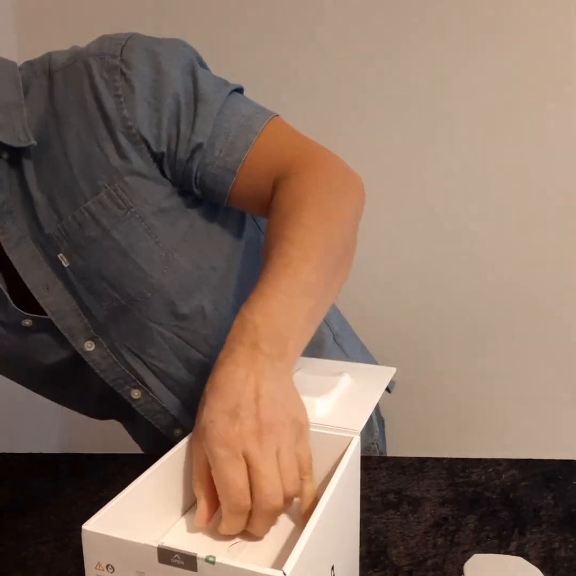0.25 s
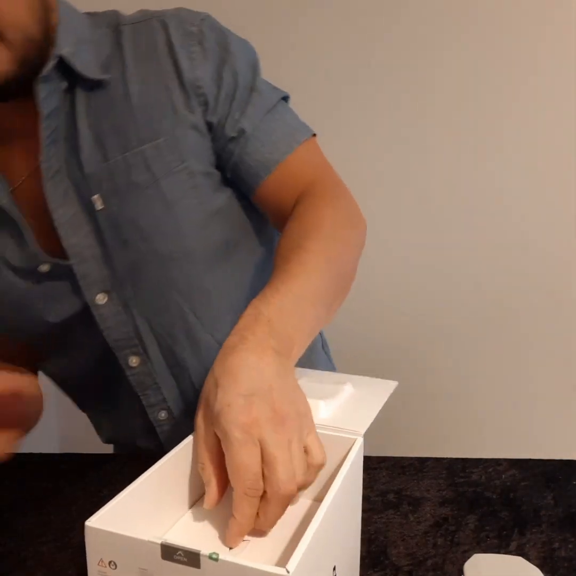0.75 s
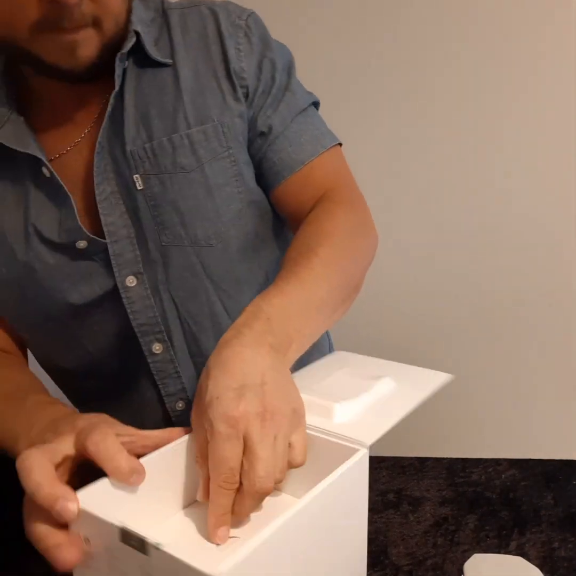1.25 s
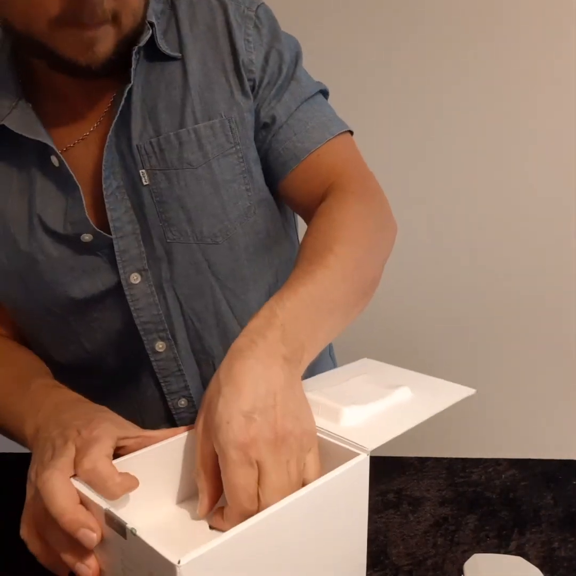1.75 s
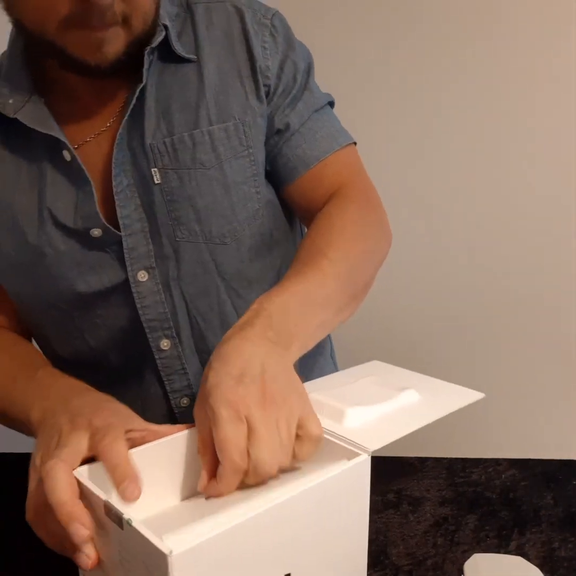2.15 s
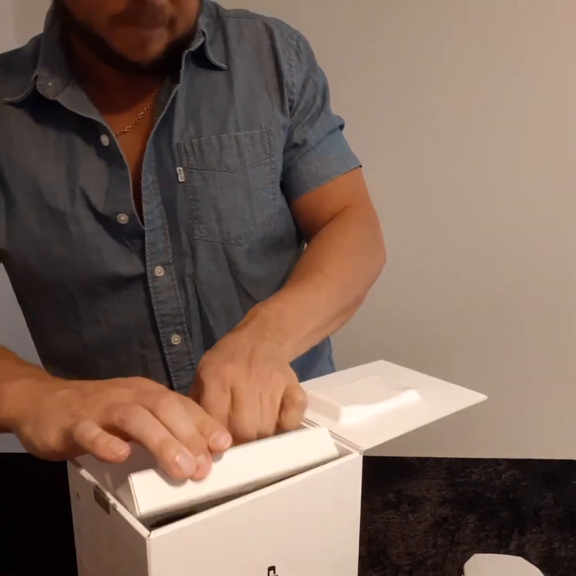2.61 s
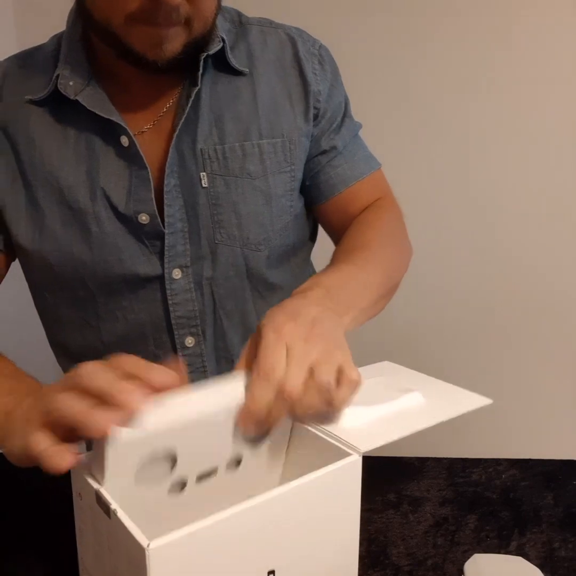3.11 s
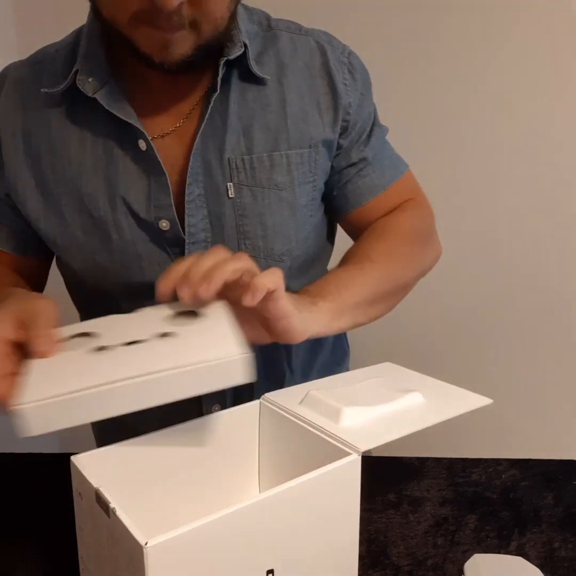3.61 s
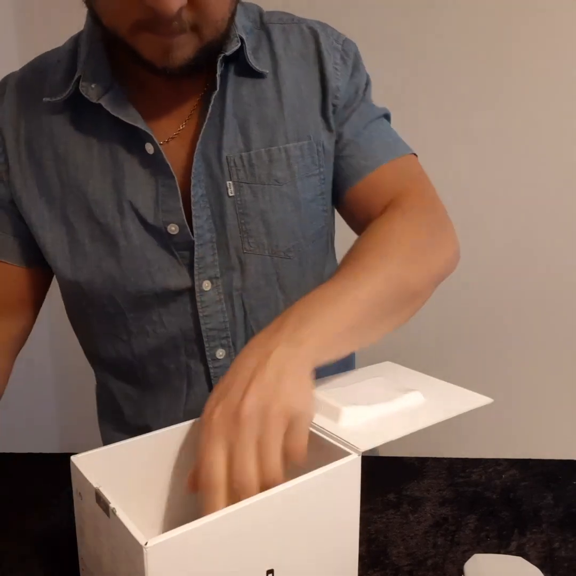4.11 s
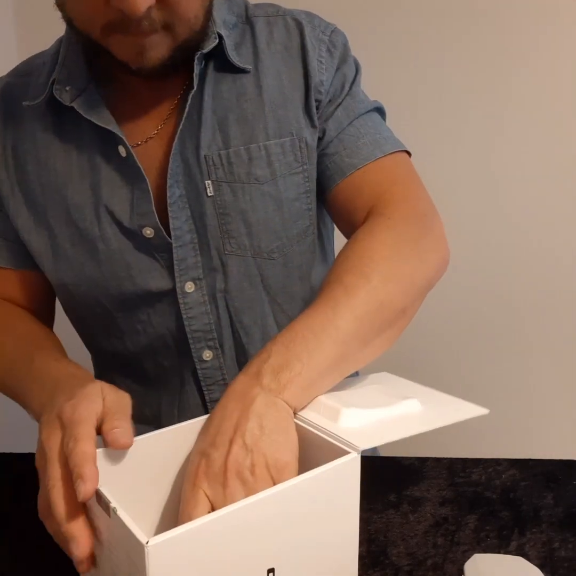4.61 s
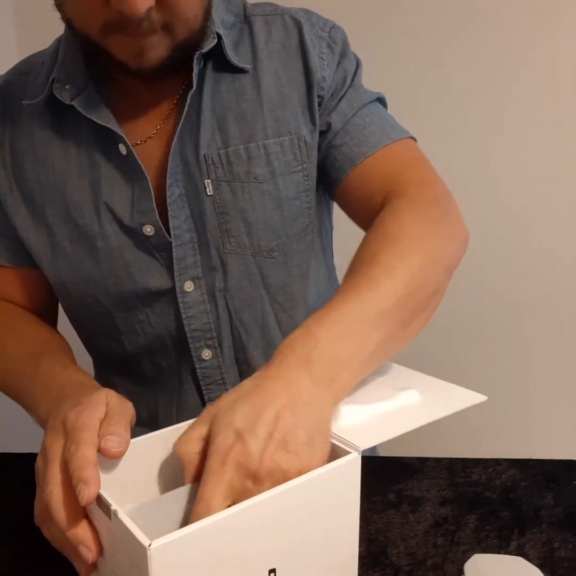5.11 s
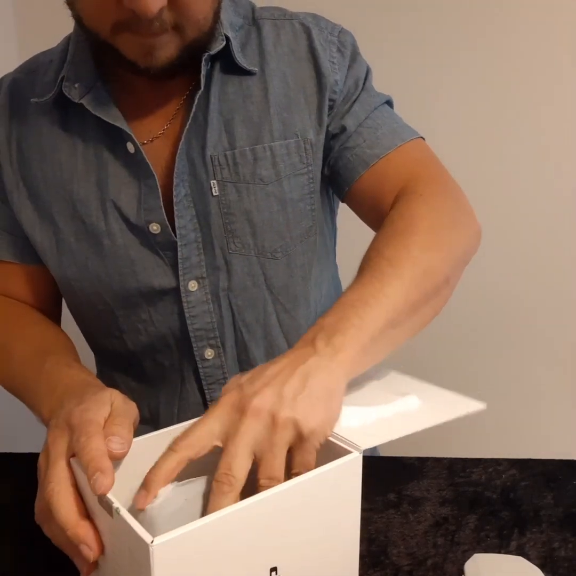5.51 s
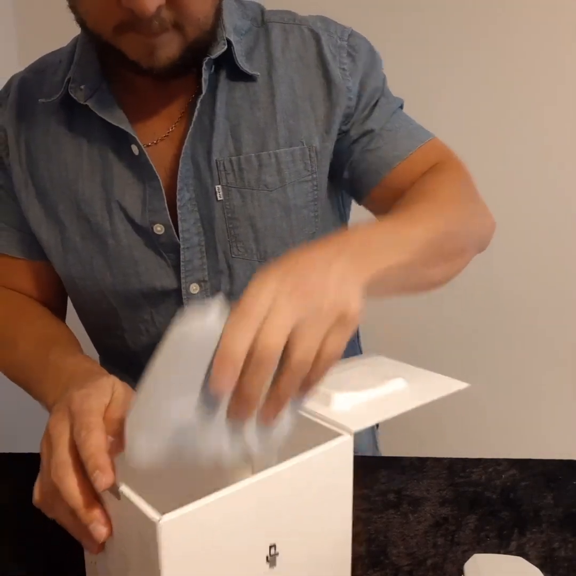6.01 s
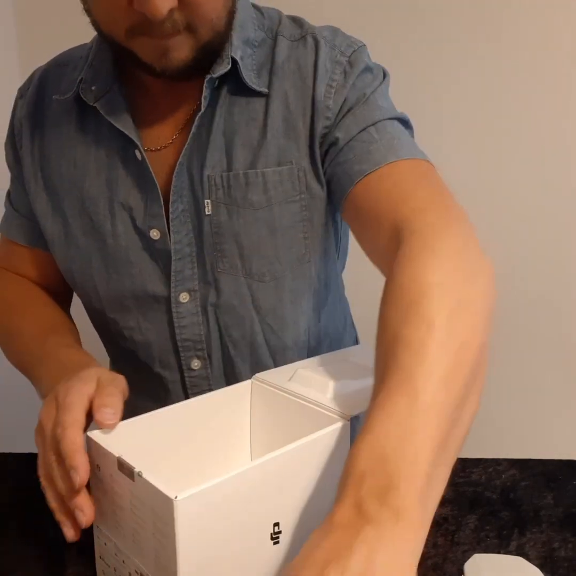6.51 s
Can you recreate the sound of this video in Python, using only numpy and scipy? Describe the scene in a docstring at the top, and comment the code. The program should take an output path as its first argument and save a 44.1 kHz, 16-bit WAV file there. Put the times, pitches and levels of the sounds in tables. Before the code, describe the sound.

A small, quiet, fairly dry room with soft hiss and a faint appliance hum, heard from very close in stereo. Light rubbing begins, and around 0.2 seconds a tight burst of hollow cardboard knocks gives the loudest clunk, with smaller bumps to 0.45. From 0.6 to 2.5 there is only subdued fumbling, with small ticks near 1.3 and 1.5. At 2.65 a card tray pops loose with a brighter knock; clicks and dry, hissing scrapes follow until about 3.9 as it slides out. Between 4.1 and 4.3 a cluster of boxy knocks sounds, with lesser ones at 4.6. A crisp hollow bump and snap come at 5.17, followed by grainy rustling to 6.0. A quieter slide and faint ticks lead to a soft, low thud on the table at 6.63.

```python
"""Unpacking a cardboard box

A hand works inside a hollow cardboard box on a table in a small quiet room: a card tray is prised up
and slid out, then a foam insert. Bumps ring damped modes of the box, card edges and foam snap as filtered
clicks, hand and card scrape as shaped noise, and the foam lands on the ringing table top.
A two-port microphone stands close by; room tone is noise, a faint appliance hum and whine are sines."""
import sys
import numpy as np
from scipy import signal
from scipy.fft import rfft, irfft, next_fast_len
from scipy.io import wavfile
from scipy.ndimage import map_coordinates

SR = 44100
rng = np.random.default_rng(int(sys.argv[2]) if len(sys.argv) > 2 else 0)


def generate_wav(signal):
    """Clip the signal to [-1, 1] and save it as 16-bit WAV at the path in sys.argv[1]."""
    frames = np.transpose(np.atleast_2d(signal))
    scaled = np.clip(frames, -1, 1) * 32767
    pcm = np.round(scaled).astype(np.int16)
    wavfile.write(sys.argv[1], SR, pcm)


N = 297672

# Treble of surface fibres and snap ticks. Each row: frequency in Hz, density in dB per Hz.
FIZZ_SPECTRUM = [(6500, -62), (8000, -2.5), (8800, -12.5), (10500, -4.5), (12200, -1), (14000, -4),
                 (16000, -5)]
# Hand position. Each row: time in seconds, lag of the left port in samples, left-over-right pan in dB.
HAND_PATH = [(0, 11.5, 0.5), (.7, -12.5, 2), (1.5, 7.5, -0.5), (2.4, 4.5, 0.5), (3.2, 5, 0.5), (3.7, -1, 1),
             (4.1, 10, 2), (4.7, 5, 2.5), (5.1, 3.5, 2.5), (5.8, 10, 1.5), (6.3, -11.5, -2), (6.43, 0, 0.5),
             (6.75, 6, -3)]


def amp(db):
    """Gain of a dB value."""
    return 10 ** (np.asarray(db) / 20)


def unit(x):
    """Scaled to rms 1."""
    return x / np.sqrt(np.mean(x ** 2) + 1e-20)


def peaked(x):
    """Scaled to peak 1."""
    return x / np.abs(x).max()


def pan_gains(pan_db):
    """Left and right gains, pan_db apart."""
    return amp([[pan_db / 2], [-pan_db / 2]])


def along(points, hz):
    """(Hz, value) points read on a log frequency axis."""
    f, v = np.transpose(points)
    return np.interp(np.log(hz + 1), np.log(f + 1), v)


def curves(rows):
    """One value per sample for each column after the time."""
    s, *cols = np.transpose(rows)
    return [np.interp(np.arange(N) / SR, s, c) for c in cols]


def wobble(knots_per_s):
    """A smooth random curve through normally distributed knots."""
    knots = rng.standard_normal(int(N * knots_per_s / SR) + 4)
    return map_coordinates(knots, [np.arange(N) * knots_per_s / SR])


def filtered(x, response):
    """x times a response of frequency."""
    n = x.shape[-1]
    m = next_fast_len(n + 4096)
    return irfft(rfft(x, m) * response(np.fft.rfftfreq(m, 1 / SR)), m)[..., :n]


def knocks():
    """Each blow rings the air in the box, its panels, flaps and edges."""
    # Each row: start in seconds, peak levels of flap, boom, panel and edge in dB before panning,
    # struck spot of panel, flap and edge in Hz, pan in dB, contact in seconds, damping factor.
    blows = [(0.108, -40, -64, -43.5, -61.5, 285, 694, 1060, -2, 0.0014, 2.4),
             (0.157, -42, -64, -56, -59.5, 285, 540, 1060, -1.5, 0.0018, 2.8),
             (0.215, -18.5, -26, -13.5, -27, 262, 520, 1200, -5, 0.0024, 0.77),
             (0.223, -8.5, -17.5, -11, -19, 242, 604, 1030, 3, 0.0015, 1.15),
             (0.241, -15.5, -18, -14, -18.5, 253, 675, 1310, -2, 0.0024, 1.7),
             (0.345, -32.5, -26.5, -26, -43.5, 273, 464, 1290, -3.5, 0.0029, 1.7),
             (0.399, -26.5, -40, -23.5, -28, 286, 497, 1060, -1, 0.0015, 2.16),
             (0.429, -45.5, -31.5, -42, -49.5, 328, 460, 2080, 0, 0.0017, 2),
             (0.672, -41, -60.5, -44.5, -61, 283, 724, 1020, -1.5, 0.0025, 0.73),
             (0.916, -66, -57, -60.5, -68.5, 191, 474, 1160, -5.5, 0.0018, 1.9),
             (0.997, -53, -73, -66, -64.5, 345, 692, 1060, -4, 0.0018, 1.1),
             (1.217, -40.5, -51, -43, -63, 231, 443, 1000, 0.5, 0.0023, 4.1),
             (1.265, -39.5, -43.5, -38, -51.5, 307, 480, 2070, -4, 0.0021, 3.2),
             (1.278, -37, -64, -51, -38, 315, 626, 2020, 1.5, 0.0034, 2.1),
             (1.428, -46, -46, -49, -61, 366, 455, 1120, 4, 0.0029, 2.2),
             (1.46, -43, -44.5, -41.5, -50, 353, 487, 1060, -2, 0.002, 1.6),
             (1.487, -40, -35, -44, -44, 191, 533, 1260, -3, 0.0018, 2.7),
             (2.632, -33, -60, -36, -37, 350, 527, 1360, -2.0, 0.0033, 1.1),
             (2.654, -21.5, -31.5, -30, -21.5, 328, 490, 2020, -1, 0.0016, 2.16),
             (2.747, -31, -51, -44.5, -42.5, 339, 690, 1030, -2, 0.0022, 1.75),
             (2.904, -47, -56, -48.5, -50, 300, 550, 1610, -4, 0.0021, 1.7),
             (2.933, -31.5, -59, -45, -31.5, 342, 760, 1710, -2, 0.0021, 2.05),
             (3, -33, -55, -46, -46, 347, 515, 1690, -1, 0.0012, 4.5),
             (3.037, -41, -52, -58, -34, 291, 694, 1740, -3.0, 0.0018, 2.3),
             (3.069, -50, -55, -47, -41, 336, 581, 1950, -3, 0.002, 1.6),
             (3.139, -55, -78, -51, -43, 245, 436, 1890, -2.0, 0.0021, 1),
             (3.397, -33, -62, -53, -45.5, 388, 433, 1480, -3.5, 0.0021, 1.2),
             (3.435, -30, -71, -47, -45.5, 371, 463, 1200, 4, 0.0024, 4.2),
             (3.462, -62, -73, -54, -38.5, 398, 487, 1100, 0.5, 0.0016, 1.2),
             (3.574, -42, -85, -70, -40.5, 385, 590, 1260, 2, 0.0021, 0.63),
             (3.602, -36.5, -74, -55, -29, 366, 950, 1100, 1, 0.0017, 1),
             (3.852, -48, -85.5, -83.5, -55, 364, 756, 2590, -2.5, 0.0018, 0.9),
             (3.907, -42.5, -79, -61, -29, 280, 996, 1040, 1.5, 0.0045, 1.14),
             (4.105, -24, -41.5, -41, -24, 358, 600, 1020, -2.5, 0.0016, 1.6),
             (4.114, -24.5, -40.5, -32, -43, 205, 611, 1130, 0, 0.002, 1.27),
             (4.198, -23, -38, -32, -43, 398, 435, 1170, 0, 0.0017, 2.9),
             (4.228, -21.5, -36, -24, -28, 323, 680, 1460, -3.0, 0.0023, 3),
             (4.275, -14.5, -20.5, -23.5, -32, 222, 660, 1050, -2, 0.0018, 2.5),
             (4.355, -49.5, -43, -45, -59, 221, 563, 2710, 10, 0.0012, 2.6),
             (4.405, -40.5, -43, -45, -47.5, 290, 694, 1500, -4, 0.0014, 3.7),
             (4.437, -36, -56, -59, -43.5, 363, 660, 2860, -3, 0.0018, 2.4),
             (4.495, -48, -76, -67, -53, 301, 510, 1660, -2, 0.0019, 1.7),
             (4.564, -40, -64, -45, -63, 280, 474, 1110, -3.0, 0.0014, 2.1),
             (4.602, -34, -46, -39, -43, 398, 650, 2360, -1.5, 0.0012, 2.5),
             (4.615, -30, -39, -31, -26, 290, 640, 1000, -2, 0.0031, 4.5),
             (4.736, -52, -79, -63, -54.5, 223, 700, 2360, -4.5, 0.0016, 1.9),
             (4.799, -50, -75, -76, -49.5, 277, 770, 1810, -3.5, 0.0024, 1.1),
             (4.881, -46, -85, -71, -67, 291, 546, 1090, 1, 0.0026, 2.4),
             (5.09, -43.5, -69, -55, -39.5, 390, 520, 1670, -3.5, 0.0027, 0.78),
             (5.146, -33.5, -35, -29.5, -32.5, 307, 890, 1030, -6.5, 0.0015, 1.85),
             (5.17, -24, -20, -25.5, -22, 199, 555, 1000, -1.5, 0.0029, 2.23),
             (5.415, -28.5, -36, -27, -32.5, 370, 438, 1390, -3, 0.0019, 3.4),
             (5.714, -62, -73, -68, -54, 269, 500, 2370, -3.5, 0.002, 1),
             (5.809, -51, -76, -51, -54.5, 347, 517, 1420, -0.5, 0.0018, 1.2),
             (5.845, -53.5, -72, -52, -57, 339, 694, 2610, -2.5, 0.0014, 2),
             (6.248, -61.5, -80, -66, -51.5, 268, 680, 2910, 4.5, 0.0018, 2),
             (6.361, -44, -84, -65, -49, 398, 478, 1010, -2.5, 0.0017, 1.03),
             (6.415, -40, -80, -73, -42, 334, 850, 2110, -4, 0.002, 1.7),
             (6.435, -36.5, -84, -63, -56.5, 398, 470, 1190, 0.0, 0.0021, 2.7),
             (6.469, -41.5, -75, -64, -60, 361, 482, 1100, 4, 0.0018, 4)]
    # Modes. Each row: frequency in Hz before scatter, relative level in dB, t60 in seconds at damping 1.
    boom_modes = [(96.3, -10, 0.15), (130.7, 2, 0.4), (155, 6.5, 0.21)]
    panel_modes = [(209.6, -5.5, 0.47), (245.3, -1.5, 0.17), (279, -1.5, 0.18), (323.3, -15, 0.63),
                   (334, -2, 0.27), (361, -3, 0.28)]
    flap_modes = [(423, -12.5, 0.12), (442, -4.5, 0.37), (486, -2.5, 0.16), (514, -5.5, 0.13),
                  (564.3, -5, 0.23), (621, 4.5, 0.089), (689.7, 0.5, 0.19), (746, 0.5, 0.1),
                  (888, -7, 0.35), (940, 11.5, 0.038)]
    edge_modes = [(1083, 0.5, 0.058), (1060, -23.5, 0.039), (1260, -2.5, 0.14), (1473, 0.5, 0.047),
                  (1656, 0, 0.052), (1920, 3, 0.015), (2110, 1, 0.069), (2370, 1, 0.18), (2750, 2.5, 0.027)]
    boom_spot_hz = 143  # where the air in the box rings best
    out, t = np.zeros((2, N + SR)), np.arange(SR // 5) / SR
    short, brief = t[:SR // 7], t[:SR // 12]  # flaps are cut sooner, edges first
    for (s, flap_db, boom_db, panel_db, edge_db, panel_hz, flap_hz, edge_hz,
         pan_db, contact_s, damping) in blows:
        boom = ringing(boom_modes, t, 3 * contact_s, damping, boom_spot_hz,
                       scatter_db=1.5, rough=.05, aim=0.1)
        panel = ringing(panel_modes, t, contact_s, damping, panel_hz,
                        scatter_db=5.4, rough=0.3, aim=0.4)
        flap = ringing(flap_modes, short, contact_s / 3, damping, flap_hz,
                       scatter_db=3, rough=.55, aim=0.3)
        edge = ringing(edge_modes, brief, contact_s / 6, damping, edge_hz,
                       scatter_db=3, rough=.85, aim=0.5)
        low = amp(boom_db) * boom + amp(panel_db) * panel
        high = np.zeros_like(low)
        high[:, :len(short)] = amp(flap_db) * flap
        high[:, :len(brief)] += amp(edge_db) * edge
        # long waves reach both ports at nearly the same level
        out[:, round(s * SR):][:, :len(t)] += low * pan_gains(pan_db / 3) + high * pan_gains(pan_db)
    return out[:, :N]


def ringing(modes, t, contact_s, damping, spot_hz, scatter_db, rough, aim):
    """Decaying modes, strongest near the struck spot's pitch; a long contact swells them slowly.

    Loose card rattles, so phases wander (rough: rms radians a cycle);
    each mode shifts phase oppositely at the two ports (aim: rms radians).
    """
    hz, db, t60 = np.transpose(modes)[:, :, None]
    detune, start_phase, level, port_phase = rng.standard_normal((4, len(modes), 1))
    octaves_off = np.abs(np.log2(hz / spot_hz))
    db = db + scatter_db * level - 14.5 * octaves_off
    steps = rng.standard_normal((len(modes), len(t)))
    wander = rough * np.sqrt(hz / SR) * np.cumsum(steps, axis=1)
    ports = aim * port_phase * [[[1]], [[-1]]]
    phase = 2 * np.pi * hz * (1 + 0.016 * detune) * t + 0.63 * start_phase + wander + ports
    ring = np.sum(amp(db - 60 * t * damping / t60) * np.sin(phase), axis=1)
    return peaked(ring * (1 - np.exp(-t / contact_s)))


def snaps():
    """Card edges and foam snap: a sharp click of breaking fibres, with a softer noise rattle behind it."""
    # Each row: time in seconds, crack level in dB, brighter tick level in dB, pan in dB,
    # rattle attenuation in dB; click_db and rattle_gain add to these levels.
    breaks = [(0.2152, -26, -50, -3, -4.5), (0.402, -34.5, -67, -1, 5), (0.595, -58.5, -82.5, -1, 22.5),
              (0.7024, -41.5, -63, 0, 12), (1.2176, -49.5, -66, -16, 14), (1.2791, -31.5, -54, -1, 23),
              (1.4623, -39, -51.5, -7, 2), (2.6399, -26, -55.5, -2.5, 7), (2.7462, -33.5, -52.5, -7, 28),
              (2.7785, -38, -43.5, -13, 24), (2.9353, -37, -57.5, 6, 18), (2.9957, -51, -62.5, -6, 16),
              (3.0375, -35.5, -57, 7, 19), (3.0728, -29, -51, 6.5, 20), (3.2817, -43, -58, -6, 16),
              (3.5559, -45, -59.5, 1.0, 16), (3.5781, -40, -61, -4, 8), (3.6003, -40.5, -54.5, 1, -5),
              (3.8261, -45.5, -70.5, -7.5, 19), (3.8556, -37, -65, -5.5, 16), (3.9055, -39, -59, -12, 0),
              (4.1044, -23.5, -60.5, 3.5, 5), (4.1976, -41.5, -57.5, 18, 19), (4.2263, -30.5, -60, 6, 23),
              (4.2806, -30.5, -47, -14.5, 6), (4.354, -39.5, -68, 0.5, 7), (4.4363, -37, -53.5, -10.5, 27),
              (4.4943, -57, -58, -2, 19), (4.6027, -41, -63.5, 6, 14), (4.6167, -26.5, -66, -7, 21),
              (4.8594, -68, -74, 5, 16), (4.8833, -47, -71, -10, 14), (4.9856, -57, -64, 1, 23),
              (5.06, -37, -59.5, 3, 16), (5.0892, -42, -55.5, 1.0, 12), (5.1721, -21.5, -46.5, -1, 1.5),
              (5.3884, -45, -45, -3, 4), (5.4924, -46.5, -54, -1, 10), (5.6326, -55.5, -63.5, -0.5, 12),
              (5.6933, -43.5, -57, -8, 11), (5.7134, -44.5, -52, -5, 22), (5.7544, -41, -55.5, -7, 16),
              (6.117, -61.5, -75.5, -2.5, 14.5), (6.2336, -51, -62, -3.0, 19.5),
              (6.326, -54, -70, -8, 13.5), (6.3604, -43, -60, -3.0, 10), (6.397, -57, -47.5, -2.5, 21),
              (6.4171, -53, -41.5, -35, 16), (6.537, -58, -51.5, -13, 18), (6.5813, -52, -68, -4.5, 13.5),
              (6.6283, -35, -59.5, -14.5, 15)]
    # Crack spectrum. Each row: frequency in Hz, density in dB per Hz.
    crack_spectrum = [(1000, -33), (2000, -11), (3500, -13.5), (5000, -11.5), (7500, -17.5), (8500, -49),
                      (10000, -58.5)]
    click_db, rattle_gain, rattle_t60_s = 6, 1 / 3, 0.079
    lead = 64  # samples of room for the click's rise
    out, t = np.zeros((2, N + SR)), (np.arange(SR // 8) - lead) / SR

    def shaped(x, spectrum):
        return filtered(x, lambda hz: amp(along(spectrum, hz)))

    spectra = (crack_spectrum, FIZZ_SPECTRUM)
    clicks = [peaked(shaped(1.0 * (t == 0), spectrum)) for spectrum in spectra]
    for s, crack_db, tick_db, pan_db, below_db in breaks:
        fade = (t > 0) * amp(-below_db - 60 * t / rattle_t60_s) * rattle_gain
        snap = np.zeros(len(t))
        for db, click, spectrum in zip((crack_db, tick_db), clicks, spectra):
            rattle = fade * unit(shaped(rng.standard_normal(len(t)), spectrum))
            snap += amp(db) * (amp(click_db) * click + rattle)
        out[:, round(s * SR) - lead:][:, :len(t)] += snap * pan_gains(pan_db)
    return out[:, :N]


def thuds():
    """The foam lands softly and rings the table top's low modes; the cloth on it makes them waver."""
    # Each row: start in seconds, level in dB, contact in seconds.
    landings = [(6.625, -18, 0.002), (6.648, -30, 0.0064)]
    # Table modes. Each row: frequency in Hz, relative level in dB, t60 in seconds.
    table_modes = [(128, -0.5, 0.15), (208.7, -2, 0.25), (261, -5, 0.2), (350, -10.5, 0.13),
                   (392, -17, 0.056), (413, -14.5, 0.36), (583, -28, 0.165), (633, -22.5, 0.172),
                   (698, -35, 0.14)]
    out, t = np.zeros(N + SR), np.arange(SR // 4) / SR
    hz, level_db, t60 = np.transpose(table_modes)[:, :, None]
    for s, db, contact_s in landings:
        steps = rng.standard_normal((len(table_modes), len(t)))
        wander = 0.16 * np.sqrt(hz / SR) * np.cumsum(steps, axis=1)
        modes = amp(level_db - 60 * t / t60) * np.sin(2 * np.pi * hz * t + wander)
        swell = 1 - np.exp(-t / contact_s)
        out[round(s * SR):][:len(t)] += amp(db) * np.sum(modes, axis=0) * swell
    return out[:N]


def rubbing():
    """Card on card catches and slips: the walls rumble in lumps, the surface fibres hiss in finer grain."""
    # Spectra. Each row: frequency in Hz, density in dB per Hz.
    shudder_spectrum = [(20, -42.5), (40, 6.5), (80, 11), (135, 9.5), (180, -6.5), (300, -51), (600, -120)]
    rumble_spectrum = [(35, -46), (60, -28), (268, -6), (405, -9), (524, -1), (599, -10), (676, -5),
                       (764, -13), (1100, -13.5), (1430, -36), (2420, -120)]
    scrape_spectrum = [(530, -26), (900, -5.5), (1140, -9.5), (1390, -4), (1720, -8.5), (2140, -13.5),
                       (3600, -9.5), (4680, -57), (7920, -120)]
    hiss_spectrum = [(1760, -14.5), (3000, -5), (3910, -1.5), (5660, 0.5), (7190, -1), (7690, -1),
                     (8800, -47.5), (11400, -35), (19400, -120)]
    # Free span of the scraping card. Each row: time in seconds, resonance in Hz.
    span_resonance = [(0.0, 2480), (0.28, 1700), (0.73, 2670), (0.79, 2240), (1.88, 1980), (2.08, 2540),
                      (2.78, 2170), (2.91, 1680), (3.31, 2560), (3.38, 1790), (3.76, 2330), (3.93, 1620),
                      (4.06, 2380), (4.14, 1930), (6.13, 2260), (6.26, 2960), (6.33, 2170), (6.75, 2180)]
    shudder_db, rest_db = -16.5, -82.5  # table shudder against the wall rumble; its constant floor
    rumble, scrape, hiss, fizz = pressure()
    pan_db = curves(HAND_PATH)[1] + 1.55 * wobble(4)
    jerks = amp(1.5 * wobble(25))  # shared by all layers
    slips = amp(2.2 * wobble(160)) * catches()
    fibres = amp(1.3 * wobble(500))
    lumps = amp(3.3 * wobble(60)) * np.sqrt(slips)

    shudder = rush(shudder_spectrum, spread=.01, grain=amp(2.4 * wobble(20)))
    walls = (amp(shudder_db) * rumble + amp(rest_db)) * shudder
    walls += rumble * rush(rumble_spectrum, spread=0.045, grain=lumps)
    card = rush(scrape_spectrum, spread=.05, grain=slips)
    card = scrape * coloured(card, curves(span_resonance)[0], lift_db=10, octaves=.26)
    skin = hiss * rush(hiss_spectrum, spread=0.027, grain=fibres * np.sqrt(slips))
    skin += fizz * rush(FIZZ_SPECTRUM, spread=0.0098, grain=fibres * slips ** 0.65)
    return jerks * (walls + (card + skin) * amp(np.array([pan_db, -pan_db]) / 2))


def pressure():
    """Rise, hold and fall of every stroke, summed as power: one gain curve for each rubbing layer."""
    # Strokes of hand, card and foam along the box. Each row: start of full pressure, hold, rise and fall
    # in seconds, then levels of wall rumble, card scrape, fibre hiss and fizz in dB.
    strokes = [(0, 0.068, .05, 0.08, -52, -55.5, -53.5, -57.5),
               (0.137, 0.092, 0.076, .05, -65, -72, -65, -70.5),
               (0.236, 0.014, 0.011, 0.071, -59, -30, -43.5, -72.5),
               (0.347, 0.069, 0.08, .1, -47, -58, -64.5, -77.5),
               (0.702, 0.016, 0.036, 0.051, -62, -89.5, -58, -62.5),
               (0.966, 0.022, 0.053, 0.15, -61.5, -65, -66, -77),
               (1.146, 0.13, 0.087, .06, -60.5, -75, -62.5, -68),
               (1.28, 0.0069, 0.027, .14, -52.5, -58, -55.5, -60.5),
               (1.454, 0.016, 0.061, 0.1, -49.5, -59, -59.5, -62),
               (1.596, 0.025, 0.11, 0.105, -60, -65, -68.5, -72.5),
               (1.671, .17, 0.18, 0.046, -65.5, -64, -74, -87.5),
               (1.906, 0.075, 0.045, 0.13, -60.5, -58.5, -82, -88),
               (2.046, 0.07, 0.14, .08, -64.5, -53.5, -60, -70),
               (2.139, 0.033, 0.059, 0.086, -50, -52.5, -56.5, -63.5),
               (2.298, 0.043, 0.065, 0.0475, -62, -66.5, -65, -76.5),
               (2.445, 0.011, 0.042, 0.068, -62, -70.5, -69, -87),
               (2.539, 0.05, 0.078, .1, -53, -55.5, -55.5, -72),
               (2.646, 0.039, 0.12, .14, -54, -47, -53, -56.5),
               (2.771, 0.008, 0.0061, 0.051, -56, -50.5, -56.5, -50.5),
               (2.946, 0.007, 0.031, 0.053, -51, -52, -53.5, -58),
               (2.986, 0.086, 0.18, .08, -53, -58, -63.5, -66), (3.076, 0.017, .02, .2, -58, -55, -50, -51),
               (3.146, 0.19, 0.16, 0.14, -58, -57, -53, -56),
               (3.389, 0.038, 0.41, 0.063, -52.5, -57, -57, -59.5),
               (3.49, 0.1, 0.1, 0.081, -62.5, -59, -63.5, -67.5),
               (3.615, 0.0067, 0.039, 0.085, -62, -45.5, -51, -57),
               (3.846, .02, 0.043, 0.052, -66, -60.5, -56, -68.5),
               (3.912, 0.0084, .06, 0.073, -74, -53, -54, -64),
               (4.112, .01, 0.024, .09, -74, -65, -52, -88),
               (4.228, 0.046, 0.11, 0.16, -55, -44.5, -52, -60),
               (4.435, 0.014, 0.008, 0.168, -62, -76, -59.5, -62.5),
               (4.616, 0.014, 0.037, 0.089, -48.5, -50.5, -56, -59.5),
               (4.751, 0.027, 0.054, 0.05, -67, -61.5, -68.5, -89),
               (4.876, .01, 0.046, 0.13, -56.5, -65, -58, -71.5),
               (5.007, 0.055, 0.074, .08, -58, -59, -61.5, -69),
               (5.1, 0.022, 0.051, .08, -57, -54.5, -50, -60.5),
               (5.181, 0.005, 0.063, .07, -43, -42, -45, -46),
               (5.245, 0.11, 0.11, .1, -52, -57.5, -55.5, -55),
               (5.388, 0.028, 0.19, 0.078, -50, -49, -49, -53.5),
               (5.535, 0.092, .08, .08, -67.5, -66, -68.5, -71),
               (5.625, 0.073, 0.05, 0.103, -82, -70, -56.5, -64.5),
               (5.718, 0.036, 0.024, 0.069, -55.5, -54.5, -53, -55.5),
               (5.797, 0.022, 0.084, 0.083, -50.5, -53.5, -54, -69.5),
               (5.863, 0.062, 0.068, 0.12, -73, -64, -50.5, -52),
               (6.018, 0.026, 0.081, .1, -74, -75.5, -69.5, -73),
               (6.246, 0.021, 0.2, .04, -80, -65.5, -59, -62.5),
               (6.323, 0.024, .04, 0.055, -63.5, -70, -67.5, -78),
               (6.424, 0.0036, 0.045, .06, -65, -52, -43.5, -44),
               (6.542, 0.051, .02, 0.082, -73, -73, -64.5, -71.5),
               (6.627, 0.0035, 0.0062, 0.013, -61, -72.5, -43.5, -57.5)]
    fade_db = 20  # gained in the rise time, lost in the fall time
    t = np.arange(0, N, 32) / SR
    start, hold, rise, fall, *levels_db = np.transpose(strokes)[:, :, None]
    before = np.maximum(start - t, 0) / rise
    after = np.maximum(t - start - hold, 0) / fall
    gains = []
    for db in levels_db:
        power = np.sum(amp(2 * (db - fade_db * (before + after))), axis=0)
        gains.append(np.interp(np.arange(N) / SR, t, np.sqrt(power)))
    return gains


def catches():
    """Fibres catch hard at random moments: sudden short lifts of the rubbing grain."""
    rate_per_s, max_lift_db = 70, 7
    fall_s = .02  # the lift in dB shrinks to a thousandth in this time
    hit_db = (rng.random(N) < rate_per_s / SR) * rng.uniform(0, max_lift_db, N)
    return amp(signal.lfilter([1], [1, -amp(-60 / SR / fall_s)], hit_db))


def coloured(x, centre_hz, lift_db, octaves):
    """A broad resonance that moves as the free span of the card changes."""
    hz, t, z = signal.stft(x, SR, nperseg=512)
    centre = centre_hz[np.minimum((t * SR).astype(int), N - 1)]
    distance = np.log2((hz[:, None] + 1) / centre) / octaves
    gain = amp(lift_db * np.exp(-distance ** 2))
    return unit(signal.istft(z * gain, SR, nperseg=512)[1][:, :N])


def rush(spectrum, spread, grain):
    """Stereo noise of rms 1; grain (two rows or one) roughens it, spread widens it."""
    # Each row: frequency in Hz, likeness of the two ports before spread is taken off.
    likeness = [(60, 0.57), (300, 1), (1000, 0.36), (4000, 0.15), (7500, 0.23), (8800, 0.91), (15000, 0.53)]

    def response(hz):
        turn = np.arccos(np.clip(along(likeness, hz) - spread, 0, 1)) / 2
        return amp(along(spectrum, hz)) * [np.cos(turn), np.sin(turn)]

    mid, side = filtered(rng.standard_normal((2, N)) * grain, response)
    return unit(np.array([mid + side, mid - side]))


def room(x):
    """A diffuse tail of decaying noise, new for every third of a second since the hand keeps moving."""
    # Each row: frequency in Hz, t60 in seconds.
    decay_times = [(100, 0.13), (700, 0.22), (4000, 0.18), (13000, 0.13)]
    out, step = np.zeros((2, N + SR)), SR // 3
    delay = 180  # samples
    for start in range(0, N, step):
        hz, t, z = signal.stft(rng.standard_normal((2, step)), SR, nperseg=256)
        decay = amp(-60 * t / along(decay_times, hz)[:, None])
        tail = signal.istft(z * decay, SR, nperseg=256)[1]
        wet = signal.fftconvolve(x[None, start:start + step], tail / np.linalg.norm(tail[0]), axes=1)
        out[:, start + delay:][:, :wet.shape[1]] += wet
    # close to the box the bass stays direct
    return filtered(out[:, :N], lambda hz: hz ** 2 / (hz ** 2 + 300 ** 2))


def quiet():
    """Room tone and microphone hiss as noise, with two slightly unsteady appliance tones."""
    # Drifting background level. Each row: time in seconds, level in dB.
    background = [(0, -68), (.6, -73.5), (1.9, -68), (2.4, -67.5), (4, -70.5), (6.75, -70)]
    # Noise spectrum. Each row: frequency in Hz, density in dB per Hz.
    quiet_spectrum = [(18, -51.5), (40, -11), (150, -2), (280, -7), (400, -5.5), (900, -14), (1700, -16.5),
                      (2800, -23.5), (4500, -10.5), (7200, -12), (8500, -26.5), (12000, -22.5),
                      (15500, -19)]
    # Hum and whine. Each row: frequency in Hz, peak in dB against the background, width in Hz.
    appliance_tones = [(276, -9.5, 3.8), (4963, -12, 8)]
    t = np.arange(N) / SR
    level_db, = curves(background)
    mix = amp(1.0 * wobble(7.5)) * rush(quiet_spectrum, spread=0.23, grain=1)
    for hz, db, width_hz in appliance_tones:
        cycles = hz * t + np.cumsum(width_hz / 2 * wobble(40)) / SR
        mix += amp(db + 1.4 * wobble(6)) * np.sin(2 * np.pi * cycles)
    return amp(level_db) * mix


def scene():
    """The left port hears the hand later or sooner as it moves; the top treble shows no such gap."""
    lag_top_hz, room_db = 8400, -4.5
    blows = knocks() + snaps() + thuds()
    hand = blows + rubbing()
    treble = filtered(hand, lambda hz: hz > lag_top_hz)
    left, right = hand - treble
    lag = curves(HAND_PATH)[0]
    left = map_coordinates(left, [np.arange(N) - lag / 2], mode="nearest")
    right = map_coordinates(right, [np.arange(N) + lag / 2], mode="nearest")
    return np.array([left, right]) + treble + amp(room_db) * room(blows.mean(axis=0)) + quiet()


def record(dry):
    """The small microphone loses the deep bass; nothing is kept above the band limit."""
    bass_hz, top_hz = 75, 16000
    return filtered(dry, lambda hz: (1j * hz / (bass_hz + 1j * hz)) ** 2 * (hz < top_hz))


dry = scene()
out = record(dry)
generate_wav(out)
```